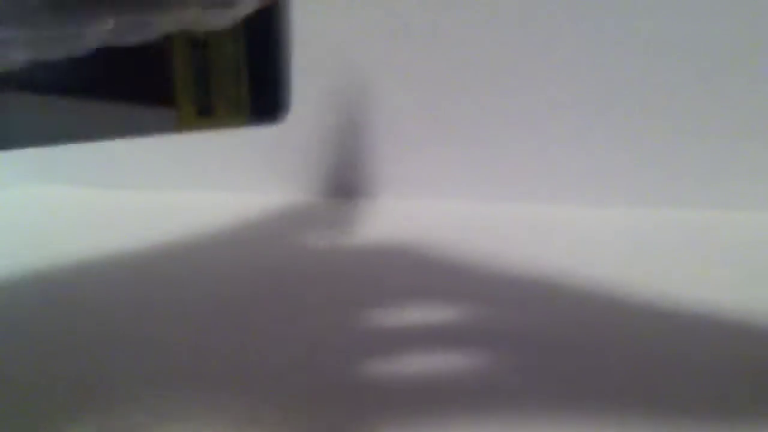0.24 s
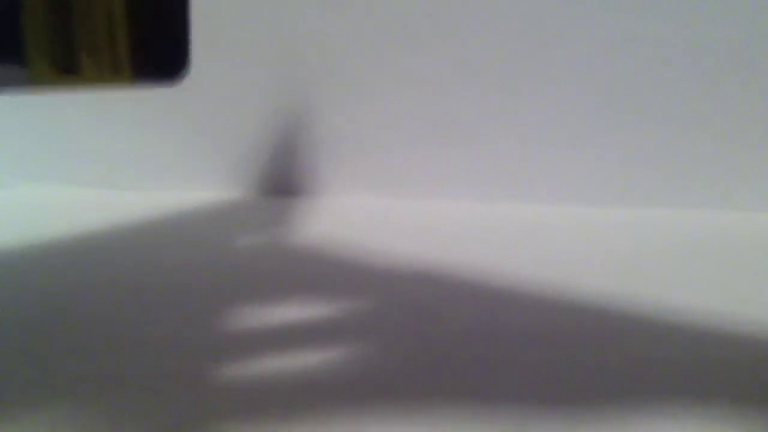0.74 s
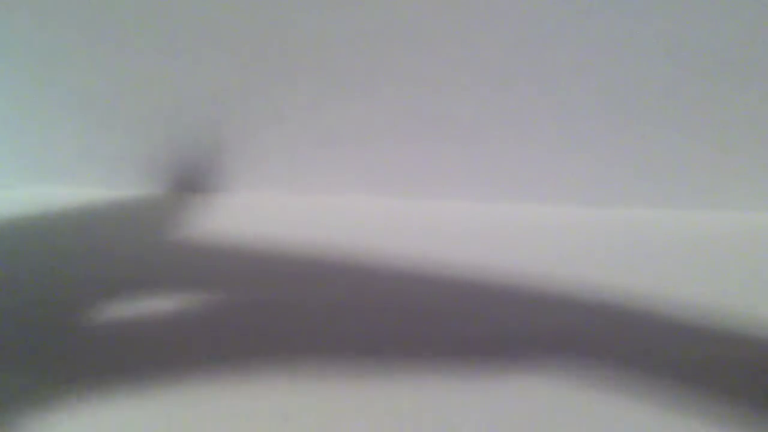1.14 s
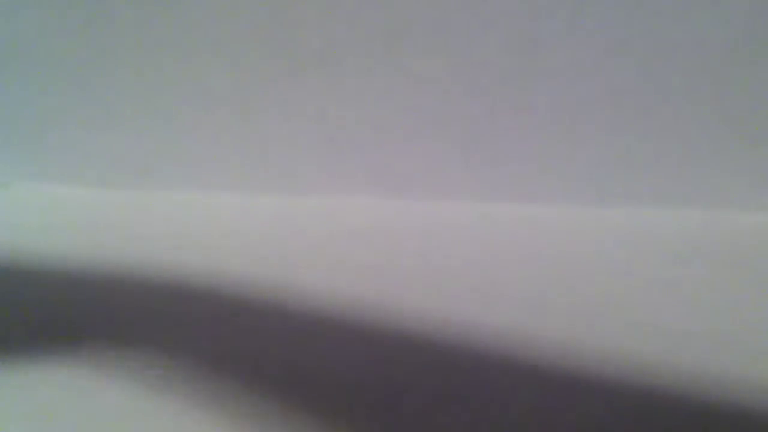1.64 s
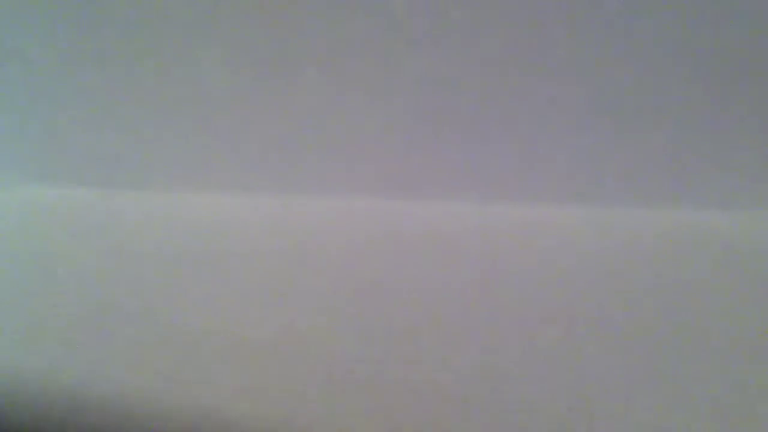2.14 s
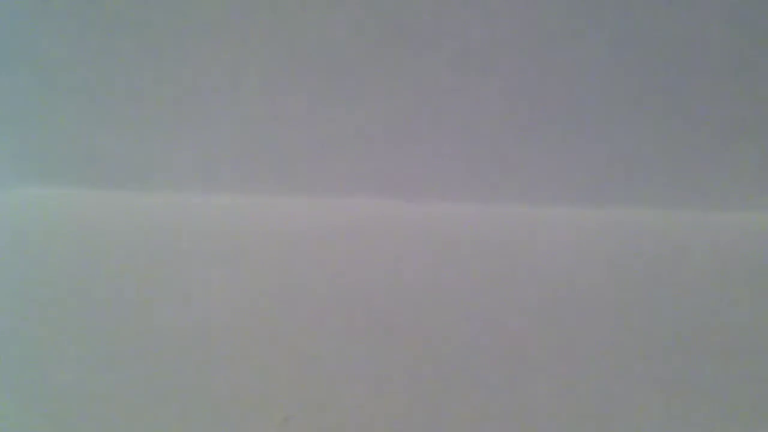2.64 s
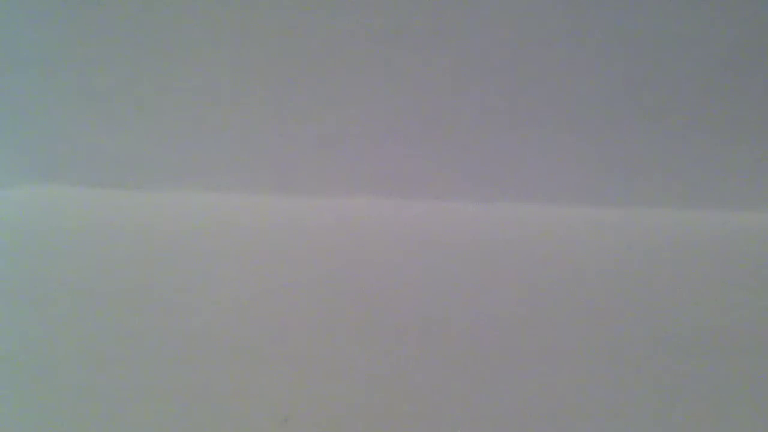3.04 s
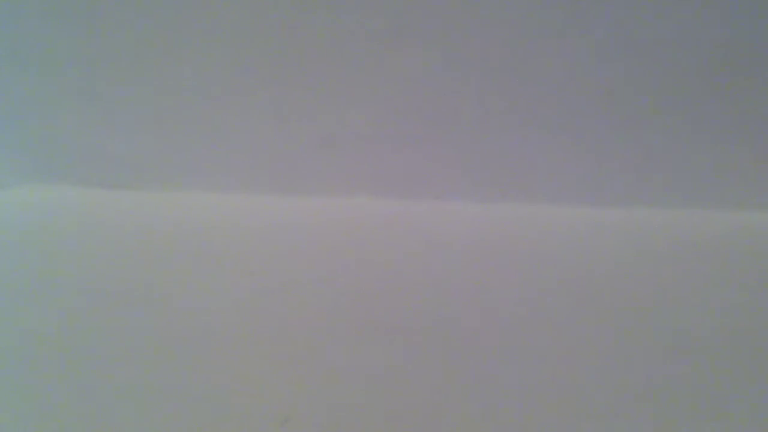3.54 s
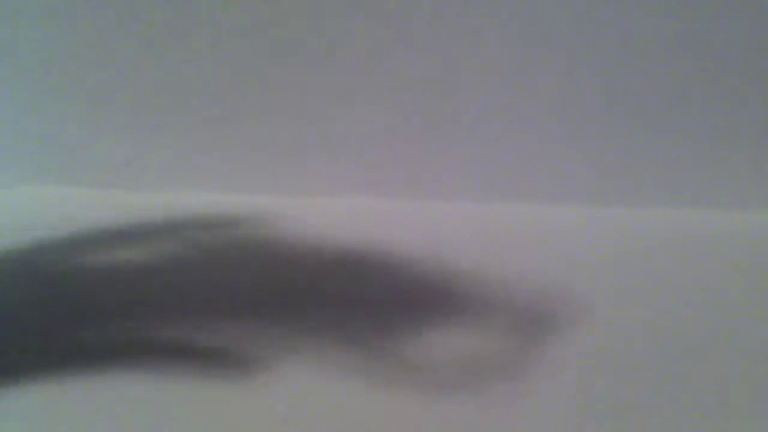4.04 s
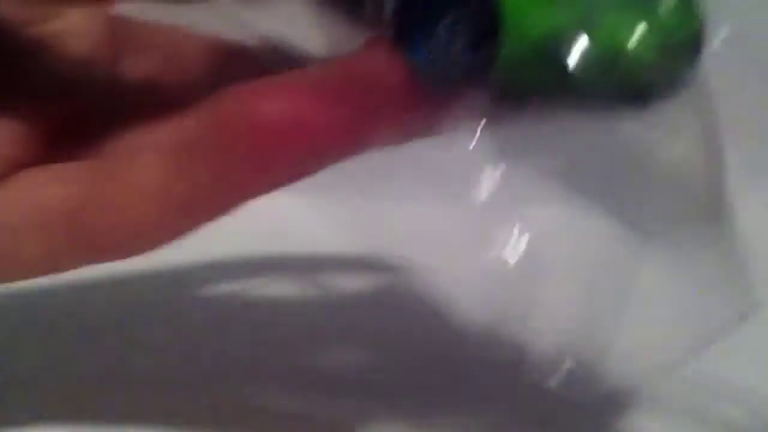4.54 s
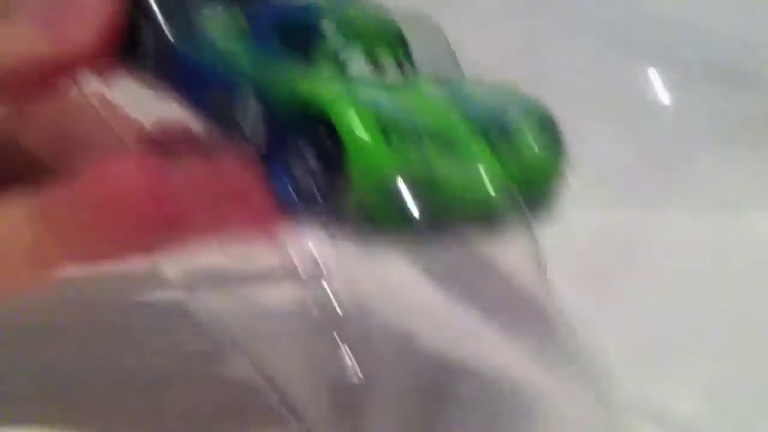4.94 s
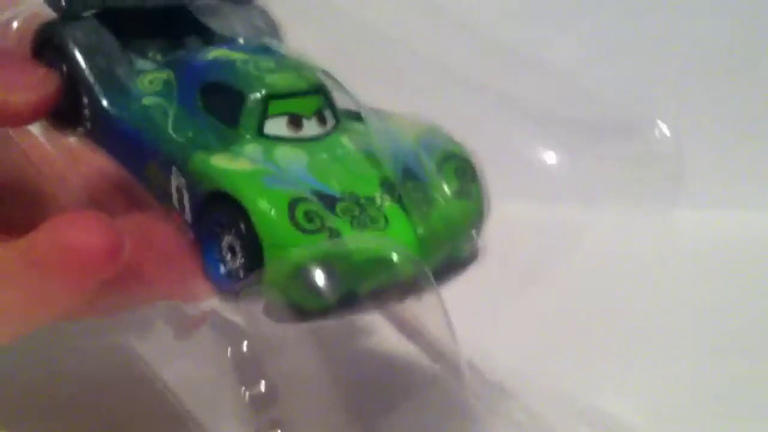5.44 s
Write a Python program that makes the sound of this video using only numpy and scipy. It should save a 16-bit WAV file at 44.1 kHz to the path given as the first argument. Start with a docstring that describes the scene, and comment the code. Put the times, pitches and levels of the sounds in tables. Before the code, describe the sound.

Stiff plastic packaging on card is pried open by hand, crackling and snapping hard in irregular bursts, then fading to small clicks.

```python
"""A small room, close to the microphone: a toy car is pried out of a stiff plastic blister on a cardboard backing.
Under faint hiss and hum, the card tears and plastic edges and film slide: clumps of filtered clicks over noise.
Drags are narrow gliding noise, creaks are near-regular strikes on a few modes, and sharp snaps are
noise bursts around one ringing pitch. The hollow pack colours them all and the room rings briefly."""
import sys
import numpy as np
from scipy import signal
from scipy.io import wavfile

SR = 44100
rng = np.random.default_rng(int(sys.argv[2]) if len(sys.argv) > 2 else 0)


def transcribe(signal):
    """Save signal, clipped to [-1, 1], as a 16-bit WAV file at the path in sys.argv[1]."""
    frames = np.atleast_2d(signal).T
    limited = np.clip(frames, -1, 1)
    pcm = np.round(limited * 32767).astype(np.int16)
    wavfile.write(sys.argv[1], SR, pcm)


N = 250914
TIME = np.arange(N) / SR
CUTOFF_HZ = 16000


def from_db(db):
    """Decibels to gain."""
    return 10 ** (np.asarray(db) / 20)


def rms_one(x):
    """Scale to unit rms."""
    return x / np.sqrt(np.mean(x ** 2) + 1e-20)


def struck(x):
    """Scale a blow so that its energy equals 6 ms at unit rms."""
    return x / np.sqrt(np.sum(x ** 2) / (0.006 * SR) + 1e-20)


def at_hz(points, hz):
    """Read a table on a log-frequency axis."""
    table_hz, value = np.transpose(points)
    return np.interp(np.log(hz), np.log(table_hz), value)


def band(x, low, high, designs={}):
    """Causal band-pass; each filter is designed once."""
    if (low, high) not in designs:
        designs[low, high] = signal.butter(2, [low, high], "band", fs=SR, output="sos")
    return signal.sosfilt(designs[low, high], x + 1e-18)


def half_octaves(low, high):
    """Rows (low, high, centre Hz) of the half-octave bands in a range."""
    edges = 17000 / 2 ** (np.arange(19, -1, -1) / 2)
    return [(a, b, np.sqrt(a * b)) for a, b in zip(edges, edges[1:]) if b > low and a < high]


def drift(rate_hz):
    """Slow random wander with spread 1: low-passed noise made at every 40th sample."""
    pole = np.exp(-80 * np.pi * rate_hz / SR)
    noise = rng.standard_normal(N // 40 + 2002)
    slow = signal.lfilter([1], [1, -2 * pole, pole * pole], noise)[2000:]   # skip the filter's start
    return np.interp(np.arange(N) / 40, np.arange(len(slow)), rms_one(slow))


def add(out, start_s, sound):
    """Mix a sound in at a time."""
    i = int(np.clip(round(start_s * SR), 0, N - 1))
    out[i:i + len(sound)] += sound[:N - i]


def narrow(t, hz, width_hz):
    """A resonance kept ringing by chance contacts; its centre may glide. Rms 1."""
    lowpass = signal.butter(2, width_hz / 2, fs=SR, output="sos")
    noise = rng.standard_normal((2, len(t) + SR // 20))
    wander = signal.sosfilt(lowpass, noise)[:, -len(t):]
    phase = 2 * np.pi * np.cumsum(hz * np.ones_like(t)) / SR
    return rms_one(wander[0] * np.cos(phase) + wander[1] * np.sin(phase))


# Colour of the room's hiss, relative levels: pitch_hz [Hz], level_db [dB]
AIR_COLOUR = [(15, -47), (25, -16), (48, -13), (157, 3.5), (200, 4), (263, -1), (326, -9), (405, -2),
              (575, -6.5), (1130, -15.5), (1440, -19), (3160, -15), (10100, -26), (14800, -22),
              (16000, -35)]
# Low resonances of the room's hum, before the hum gain: pitch_hz [Hz], width_hz [Hz], level_db [dB]
HUM_RESONANCES = [(102.4, 24, -73.5), (169.6, 27.5, -63.5), (213, 24, -63.5), (308.3, 19.3, -65),
                  (345, 16, -64.5)]


def background(air_db, hum_gain_db):
    """Faint hiss and a low hum gathered in the room's resonances."""
    air = 0
    for low, high, hz in half_octaves(20, 16000):
        air = air + from_db(at_hz(AIR_COLOUR, hz)) * band(rng.standard_normal(N), low, high)
    hum = 0
    for hz, width, db in HUM_RESONANCES:
        resonance = band(rng.standard_normal(N), hz - width / 2, hz + width / 2)
        hum = hum + from_db(db) * rms_one(resonance)
    return from_db(air_db) * rms_one(air) + from_db(hum_gain_db) * hum


# Decay of the reverberation: pitch_hz [Hz], t60_s [s]
ROOM_DECAY = [(150, 0.42), (800, 0.5), (3000, 0.59), (8000, 0.06), (16000, 0.3)]
# Colour of the reverberation, before the wet level: pitch_hz [Hz], level_db [dB]
ROOM_TONE = [(150, -15.5), (400, -3), (800, -3.5), (2500, -8.5), (7000, -8), (15000, -20)]


def room(x, wall_s, wall_db, gap_s, wet_db):
    """A near wall answers, and a diffuse tail builds up and dies away, soonest around 8 kHz."""
    t = TIME[:SR // 2]
    tail = 0
    for low, high, hz in half_octaves(100, 16000):
        t60 = at_hz(ROOM_DECAY, hz)
        decay = from_db(at_hz(ROOM_TONE, hz) - 60 * t / t60)
        unit_energy = np.sqrt(2 * np.log(1000) / (SR * t60))   # long decays get no extra energy
        tail = tail + band(rng.standard_normal(len(t)), low, high) * decay * unit_energy
    response = from_db(wet_db) * tail * (1 - np.exp(-(t / gap_s) ** 2))
    response[int(wall_s * SR)] += from_db(wall_db)
    return signal.fftconvolve(x, response)[:N]


# Resonances of the hollow blister and its card: pitch_hz [Hz], width_hz [Hz], level_db [dB]
CAVITY_RESONANCES = [(211, 20, -3.5), (605, 19.5, 0), (867, 210, -11.5), (1170, 110, -8), (2490, 160, -6),
                     (3040, 320, -6), (3460, 160, -14), (7100, 4400, -12)]


def blister(x):
    """The hollow pack colours everything; so small a sheet radiates no deep bass."""
    rung = 0
    for hz, width, db in CAVITY_RESONANCES:
        rung = rung + from_db(db) * signal.lfilter(*signal.iirpeak(hz, hz / width, fs=SR), x)
    return signal.sosfilt(signal.butter(2, 120, "high", fs=SR, output="sos"), x + rung)


# Between strokes the fingers keep rubbing the pack: time_s [s], level_db [dB]
GRIP_LEVELS = [(0, -57.5), (.42, -56.5), (.6, -50.5), (1.2, -50.5), (1.55, -46), (1.66, -57.5), (1.95, -43),
               (2.3, -64.5), (2.55, -56), (2.85, -63.5), (3.05, -59), (3.4, -56), (3.53, -61),
               (4.05, -61.5), (4.4, -70), (4.7, -60.5), (5.0, -79), (5.69, -76.5)]


def grip_level():
    """Level in dB of the steady finger rub, gliding between the table's points."""
    return np.interp(TIME, *np.transpose(GRIP_LEVELS))


# The hands pull in separate strokes, each with its own mix of tearing, scraping and sliding:
# start_s [s], length_s [s], tear_db [dB], scrape_over_tear_db [dB], slide_over_tear_db [dB]
PULL_STROKES = [(0.079, 0.06, -48, -3, 3.5), (0.156, 0.062, -42.5, -8, -0.5),
                (0.342, 0.026, -40, -19, -5.5), (0.433, 0.042, -50.5, -6, -0.5),
                (.61, 0.082, -43.5, -18, -6.5), (0.717, 0.021, -40.5, -6, -4),
                (0.774, 0.079, -31.5, -3.5, -3), (0.932, 0.11, -39.5, -4, -8), (1.012, .04, -39.5, -8, -4),
                (1.138, 0.059, -38, -3, -9), (1.206, 0.092, -46, -3, -2), (1.385, 0.081, -30, -5, -5),
                (1.533, 0.031, -52, 7, 7), (1.699, .04, -42.5, -13, -1.5), (1.802, 0.058, -34.5, -2, -13),
                (1.896, 0.082, -35.5, 2.5, -5), (2.024, 0.04, -31, -9, -14),
                (2.207, 0.025, -50.5, -19, 4.5), (2.584, 0.12, -35.5, -6, -16.5),
                (2.726, 0.063, -38, -13, -21), (3.104, 0.23, -54, 6, 4.5), (3.465, 0.021, -52, 7, 4),
                (3.578, 0.02, -42.5, 3.5, -5), (3.601, 0.02, -54.5, 10, 15.5), (3.676, 0.15, -50, -4, -9),
                (3.777, 0.056, -45.5, 3, 0.5), (4.159, 0.045, -52, -4, -7), (4.573, 0.069, -49, 1, -15),
                (4.678, .11, -56, 3.5, -18), (5.15, 0.14, -52, 0.5, -3), (5.273, 0.15, -56, 1.5, -4.5)]
PULL_ATTACK, PULL_RELEASE_S, PULL_SAG_DB = 0.34, 0.015, 4.5   # share of stroke; time constant; loss over stroke


def effort(steady_db, scrape=0, slide=0):
    """Gain of one friction: each pull builds up, sags and lets go, over the steady rub of the grip."""
    power, t = from_db(steady_db) ** 2, TIME[:SR // 2]
    for start, length, tear_db, scrape_db, slide_db in PULL_STROKES:
        level_db = tear_db + scrape * scrape_db + slide * slide_db
        done = np.clip(t / length, 0, 1)
        attack = np.minimum(done / PULL_ATTACK, 1)
        release = np.exp(-np.maximum(t - length, 0) / PULL_RELEASE_S)
        stroke = attack * release * from_db(level_db - PULL_SAG_DB * done)
        add(power, start, stroke ** 2)
    return np.sqrt(power)


def friction(colour, per_s, spread_db, smooth_db, clump_db):
    """Fibres part and ridges catch in clumps of tiny clicks, each with its own colour, over a smooth rub; rms 1."""
    born = np.flatnonzero(rng.random(N) < per_s / SR)
    size_db = spread_db * np.minimum(rng.exponential(1, len(born)), 3.5)
    sizes = from_db(size_db + clump_db * drift(41.5)[born])
    out = 0
    for low, high, hz in half_octaves(colour[0][0], colour[-1][0]):
        clicks = np.zeros(N)
        clicks[born] = sizes * rng.standard_normal(len(born))   # drawn anew per band: own colour
        rub = from_db(smooth_db) * rng.standard_normal(N)
        out = out + from_db(at_hz(colour, hz)) * band(rms_one(clicks) + rub, low, high)
    return rms_one(out)


# Colour of tearing card, relative levels: pitch_hz [Hz], level_db [dB]
CARD_COLOUR = [(100, -22), (200, -7.5), (450, -4.5), (650, -2), (1200, -3.5), (1700, -4), (2500, -17),
               (4000, -39)]


def card_tearing(grip_db):
    """Card fibres part in dense crackle, driven by the pulls and the grip."""
    crackle = friction(CARD_COLOUR, per_s=450, spread_db=2.0, smooth_db=-5.5, clump_db=2.0)
    return from_db(-0.5) * effort(grip_db) * crackle


# Colour of the scraping plastic edge, relative levels: pitch_hz [Hz], level_db [dB]
EDGE_COLOUR = [(1200, -37), (1900, -4.5), (2600, -1), (3200, -6.5), (4200, -13), (6500, -15.5)]


def edge_scraping(grip_db):
    """The plastic edge catches and scrapes, driven by the pulls and the grip."""
    scrape = friction(EDGE_COLOUR, per_s=520, spread_db=2.0, smooth_db=-2.5, clump_db=2.5)
    return from_db(-3.5) * effort(grip_db - 2.5, scrape=1) * scrape


# Colour of the sliding film, relative levels: pitch_hz [Hz], level_db [dB]
FILM_COLOUR = [(3500, -9), (5200, 2), (7500, 0.5), (10000, -2.5), (15500, -4.5)]


def film_sliding(grip_db):
    """Plastic film slides with a fine, bright rustle, driven by the pulls and the grip."""
    rustle = friction(FILM_COLOUR, per_s=1400, spread_db=1.0, smooth_db=-4.5, clump_db=2.5)
    return from_db(-1.5) * effort(grip_db - 3.5, slide=1) * rustle


# Plastic dragged over plastic excites one resonance of the bent sheet; levels before swell and judder:
# start_s [s], end_s [s], start_hz [Hz], end_hz [Hz], width_hz [Hz], level_db [dB]
DRAGS = [(0.894, 0.91, 797, 620, 160, -26), (2.024, 2.118, 618.5, 590, 80, -38.5),
         (2.487, 2.528, 889, 904, 170, -46), (2.613, 2.735, 708, 721, 129, -39),
         (2.681, 2.933, 1193, 1142, 170, -48), (3.169, 3.333, 2585, 2460, 340, -44.5),
         (3.243, 3.438, 7460, 6870, 1500, -57), (3.352, 3.494, 5330, 5160, 1300, -55),
         (3.316, 4.157, 1760, 1760, 170, -59.5), (3.666, 3.87, 5420, 4960, 1700, -52),
         (4.539, 4.793, 480, 446, 140, -63), (5.152, 5.28, 2490, 2330, 605, -53)]


def rubs(rough_db, crest, slip_hz, slip_db):
    """Each drag swells quickly, throbs as it sticks and slips, and fades."""
    slip_rate = slip_hz * np.exp(0.15 * drift(14.73))
    slips = np.cos(2 * np.pi * np.cumsum(slip_rate) / SR)
    judder = rms_one(from_db(rough_db * drift(60) + slip_db * slips))
    out, t = np.zeros(N), TIME[:SR]
    for start, end, first_hz, last_hz, width, level_db in DRAGS:
        done = np.clip(t / max(end - start, 0.01), 0, 1)
        swell = np.sqrt(np.interp(done, [0, crest, 1], [0, 1, 0]))
        tone = narrow(t, first_hz + (last_hz - first_hz) * done, width)
        add(out, start, from_db(level_db) * swell * tone)
    return out * judder


# The edge sticks and slips; level before chance: first_slip_s [s], last_slip_s [s], gap_s [s], level_db [dB]
CREAK_RUNS = [(.5272, 0.568, .006, -37), (0.62, 0.67, .009, -47)]
# Resonances of a slip, relative levels: pitch_hz [Hz], t60_s [s], level_db [dB]
SLIP_MODES = [(1160, 0.024, 0), (1470, 0.0074, 16), (1990, 0.013, 7), (3100, .005, -14)]


def creaks():
    """Near-regular slips ring the same few modes."""
    out, t = np.zeros(N), TIME[:SR // 40]
    for first, last, gap, level_db in CREAK_RUNS:
        for start in np.arange(first, last, gap):
            slip = 0
            for hz, t60, db in SLIP_MODES:
                ring = from_db(db + rng.normal(0, 4.1) - 60 * t / t60)
                slip = slip + ring * np.sin(2 * np.pi * hz * t)
            gain = from_db(level_db + rng.normal(0, 1.4))
            add(out, start + gap * rng.normal(0, 0.025), gain * struck(slip))
    return out


def jolts(cracks, level_db, top_hz):
    """The force of a hard snap jolts the whole pack and the hands with a dull thud."""
    return from_db(level_db) * band(cracks ** 2, 22, top_hz)   # squaring favours the hard snaps


def shell(t, low, high, t60, flutter_db, flutter_t60, lumpy_db, lead_s, strain_db):
    """One range of the shell's dense modes: the sheet strains, collapses, then rattles on unevenly."""
    after = np.maximum(t - lead_s, 0)
    lumps = from_db(lumpy_db * np.interp(t, np.linspace(0, t[-1], num=50), rng.standard_normal(size=50)))
    rattle = lumps * from_db(flutter_db - 60 * after / flutter_t60)
    collapse = from_db(-60 * after / t60) + rattle
    envelope = np.where(t < lead_s, from_db(strain_db) * t / lead_s, collapse)
    burst = band(rng.standard_normal(len(t)), low, high) * envelope
    return band(burst, low / 2, min(high * 2, CUTOFF_HZ))


# Limits of the shell's thump, body, clack, crack and fizz: edge_hz [Hz]
SHELL_EDGES_HZ = [150, 560, 1700, 4500, 9500, 16000]
# Ring time of the shell in each of those ranges: t60_s [s]
SHELL_RING_S = [0.022, 0.044, 0.02, 0.0096, 0.0096]


def buckle(level_db, ring_hz, bass_fall, treble_fall, ring_db, ring_t60, ring_width, lead_s):
    """One facet flips: it rings at its own pitch and shakes the shell's other ranges by the given falls per octave."""
    t = TIME[:SR // 10]
    after = np.maximum(t - lead_s, 0)
    lows, highs = SHELL_EDGES_HZ[:-1], SHELL_EDGES_HZ[1:]
    octave = np.log2(np.multiply(lows, highs)) / 2
    away = octave - octave[np.searchsorted(SHELL_EDGES_HZ, ring_hz) - 1]
    levels = level_db + np.where(away < 0, bass_fall * away, -treble_fall * away)
    sound = 0
    for low, high, db, t60 in zip(lows, highs, levels, SHELL_RING_S):
        part = struck(shell(t, low, high, t60, flutter_db=-21.5, flutter_t60=0.15,
                            lumpy_db=5.5, lead_s=lead_s, strain_db=-15.5))
        if low < ring_hz <= high:   # the facet rings on in a cluster of close modes
            decay = (t > lead_s) * from_db(-60 * after / ring_t60)
            ring = struck(narrow(t, ring_hz, ring_width * ring_hz) * decay)
            part = struck(part + from_db(ring_db) * ring)
        sound = sound + from_db(db) * part
    return sound


# The shell buckles, coloured around the flipping facet's pitch; levels before the common gain:
# time_s [s], level_db [dB], facet_hz [Hz], bass_fall [dB per octave], treble_fall [dB per octave]
BUCKLES = [(0.0348, -42, 9700, 6, -1), (0.0637, -31, 1300, 5.5, 5.5), (0.2068, -36, 728, 3, 1.1),
           (.2507, -41, 1270, 5, 15), (.274, -48.5, 600, -0.5, 1), (0.496, -37.5, 1254, 9, 1),
           (0.5211, -29.5, 1168, 20, 3), (0.6036, -31.5, 1120, 21, 11), (.6108, -37, 1100, 20, 8),
           (.63, -37, 1036, 16, 7), (.6569, -41, 920, 7, 10), (.682, -36.5, 880, 3, 3.5),
           (.6976, -40, 886, 14, 3.5), (.716, -46, 7000, 5, 2), (.736, -38.5, 900, 16, -0.5),
           (.7981, -28.5, 970, 16, 6), (0.8212, -26.5, 1110, 23, 13), (.8957, -24.5, 758, 11, 6.5),
           (.9015, -47, 690, 0.5, 12), (1.1294, -36, 2620, 13, 3.5), (1.178, -23, 1128, 9, 15),
           (1.1845, -24, 1773, 3, 16), (1.2459, -27, 1110, 14, 12), (1.381, -16.5, 1110, 2.5, 2),
           (1.3821, -18.5, 780, 5, 10), (1.3953, -27, 1112, -1, 4), (1.432, -31, 1330, 8, 2.5),
           (1.44, -27.5, 580, 7, 6), (1.457, -32, 620, 11, 3), (1.5219, -26.5, 1550, 19, 4),
           (1.5547, -35.5, 2100, 8, 1), (1.578, -40.5, 2020, 8, 2), (1.6185, -42.5, 1230, 12, 3.5),
           (1.69, -42, 1590, 3, 10), (1.709, -36.5, 1583, 13, 2.5), (1.72, -38, 1524, 9, 5),
           (1.8012, -38, 9740, 6, 0), (1.8112, -25.5, 913, 10, 3.5), (1.816, -25, 937, 8, 3),
           (1.831, -16, 1400, 22, 3.5), (1.883, -20.5, 679, 11, 2), (1.888, -28.5, 920, 2.5, 8),
           (1.933, -26, 1495, 14, 5.5), (1.958, -20, 7120, 2.5, 8.5), (1.982, -35, 3080, 11, 4),
           (2.0074, -19, 1607, 4, 5.5), (2.0904, -28, 775, 17, 6.5), (2.097, -35, 602, 5, 5),
           (2.136, -40, 814, 2, 2), (2.172, -31.5, 2340, 1, 3.5), (2.37, -37.5, 3940, 10, 12),
           (2.5028, -43, 897, 3, 9), (2.548, -41.5, 900, 10, 5.5), (2.598, -32, 1607, 18, 5),
           (2.6085, -30.5, 2194, 4, 15), (2.644, -31.5, 2120, 13, 15), (2.695, -30.5, 1120, 18, 7),
           (2.733, -28.5, 826, 5, 11), (2.7423, -29.5, 824, 4, 15), (2.748, -29.5, 1164, 15, 20),
           (3.083, -44, 1880, 6, 6), (3.1396, -35.5, 650, 13, 2), (3.184, -23, 2390, 7, 4),
           (3.2783, -34.5, 685, 19, 3), (3.422, -47.5, 2880, 6, 6), (3.477, -42, 1536, 0, 12),
           (3.482, -41, 1703, 5, 6), (3.6311, -45, 636, 8.5, 1), (3.689, -42, 627, 3, 6),
           (3.8225, -31, 1755, 8, 13), (3.8298, -30, 1610, 13, 3), (3.835, -39, 1280, 13, 2.5),
           (3.8923, -46.5, 1170, 6, 1.5), (3.9631, -52, 690, 6, 1.5), (3.9736, -54, 1187, 6, 0.5),
           (4.1452, -37, 1755, 2.5, 10.5), (4.2205, -50, 710, 2, 3), (4.299, -50, 1840, 0.5, 18),
           (4.4119, -54.5, 2420, -2, 7), (4.4786, -40, 2690, 7, 9.5), (4.5018, -42.5, 2670, 3, 10),
           (4.521, -50, 2860, -1, 9), (4.5333, -48, 2760, 2, 7), (4.5645, -44.5, 2850, 1.5, 7),
           (4.578, -46.5, 2600, 0.5, 6), (4.642, -42.5, 2526, 12, 15), (4.7283, -54, 1240, 8, 6),
           (4.8117, -48.5, 2600, 2.5, 6), (4.84, -42, 2800, 6.5, 11), (4.8845, -33, 1740, 3, 21),
           (4.9296, -43.5, 2420, 6, 15), (5.015, -61, 4100, 1, 7), (5.146, -39.5, 259, 5, 7.5),
           (5.1523, -40.5, 2430, 6.5, 5.5), (5.1896, -45, 2490, 11, 15), (5.2075, -40.5, 2740, 5, 10),
           (5.4926, -53, 3330, 7, 1.5)]
TICKS_PER_S, TICK_DB, TICK_SPREAD_DB = 12, -0.5, 5   # mean rate; level over the grip's, before gain; +/- spread
TICK_LOW_HZ, TICK_HIGH_HZ = 1100, 3310


def snaps(grip_db, lead_s, gain_db):
    """The big buckles, and small creases that give way at random while the pack is gripped."""
    waits, sizes, pitches = rng.random((96, 3)).T
    times = np.cumsum(-np.log(1 - waits)) / TICKS_PER_S
    ticks_db = np.interp(times, TIME, grip_db) + TICK_DB + TICK_SPREAD_DB * (2 * sizes - 1)
    ticks_hz = TICK_LOW_HZ * (TICK_HIGH_HZ / TICK_LOW_HZ) ** pitches
    ticks = [(s, db, hz, 5, 6) for s, db, hz in zip(times, ticks_db, ticks_hz)]
    out = np.zeros(N)
    for s, level_db, *colour in list(BUCKLES) + ticks:
        snap = buckle(level_db + gain_db, *colour, ring_db=1.5, ring_t60=0.02, ring_width=0.19, lead_s=lead_s)
        add(out, s - lead_s, snap)   # the strain comes first, so the collapse lands on time
    return out


def scene():
    """Snaps, creaks and friction of the pack, in the room."""
    grip_db = grip_level()
    frictions = card_tearing(grip_db) + edge_scraping(grip_db) + film_sliding(grip_db)
    drags = creaks() + rubs(rough_db=5, crest=0.17, slip_hz=114.7, slip_db=1.0)
    cracks = snaps(grip_db, lead_s=0.004, gain_db=-1.8)
    pack = blister(cracks + drags + frictions)
    heard = pack + room(pack, wall_s=0.013, wall_db=-21.5, gap_s=0.0059, wet_db=-3.0)
    thuds = jolts(cracks, level_db=-14, top_hz=62)
    return (heard + thuds + background(air_db=-59.5, hum_gain_db=0.5))[None]


def record(dry):
    """The loudest cracks are rounded by overload; the top is cut steeply."""
    ceiling = 0.75   # full scale is 1
    rounded = dry / (1 + (dry / ceiling) ** 4) ** 0.25
    return signal.sosfilt(signal.ellip(10, 0.2, 80, CUTOFF_HZ, fs=SR, output="sos"), rounded)


dry = scene()
out = record(dry)
transcribe(out)
```